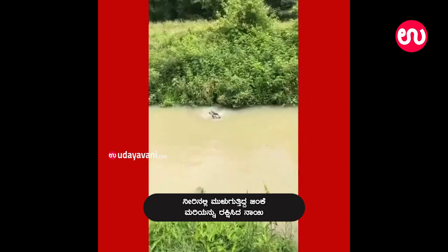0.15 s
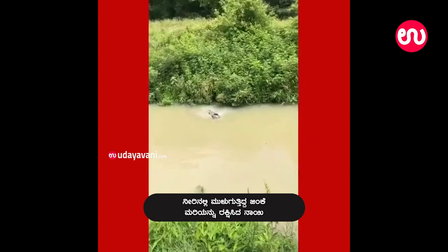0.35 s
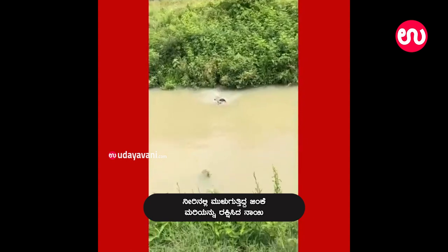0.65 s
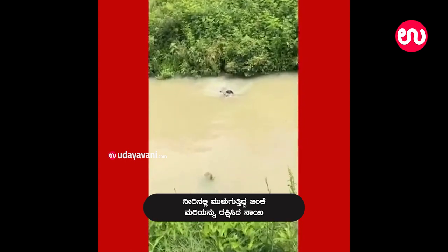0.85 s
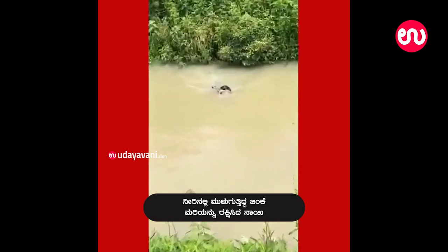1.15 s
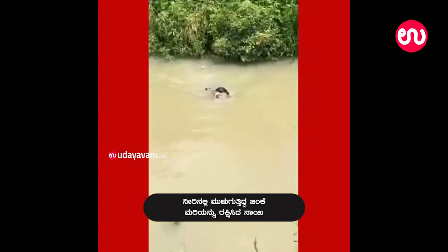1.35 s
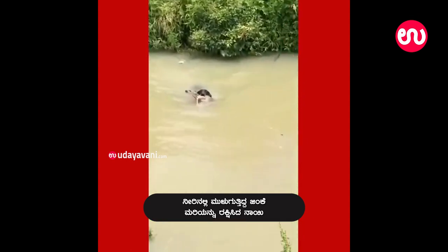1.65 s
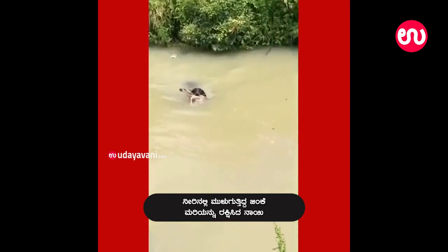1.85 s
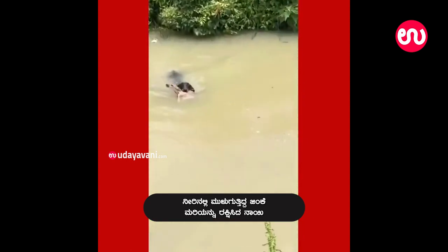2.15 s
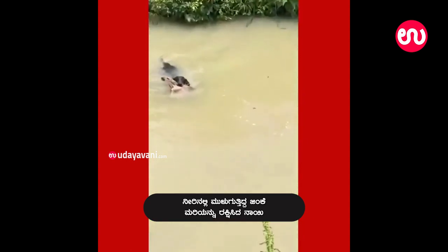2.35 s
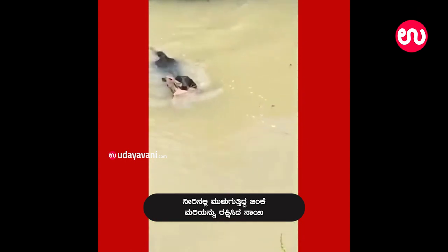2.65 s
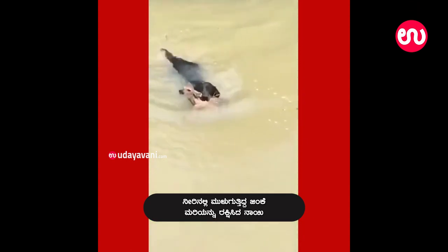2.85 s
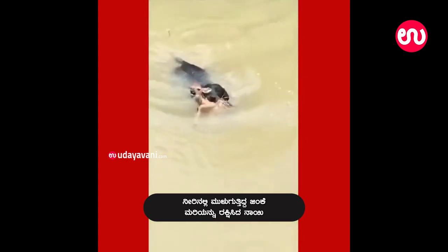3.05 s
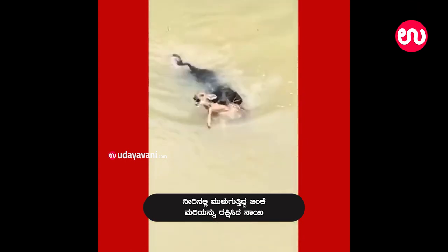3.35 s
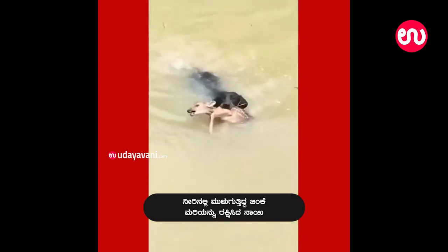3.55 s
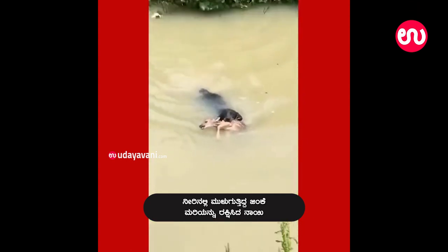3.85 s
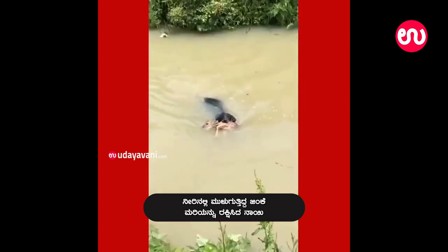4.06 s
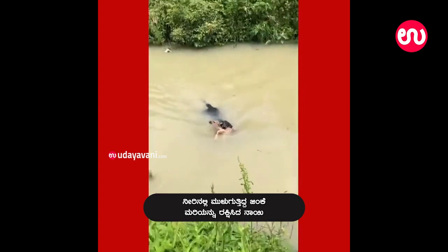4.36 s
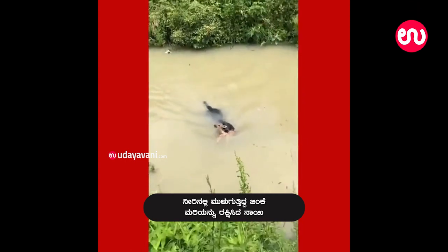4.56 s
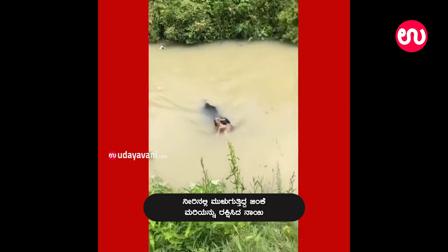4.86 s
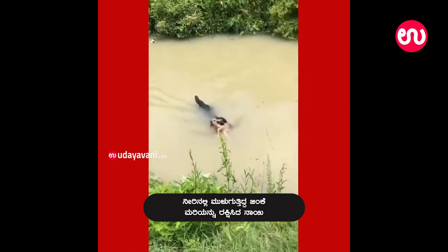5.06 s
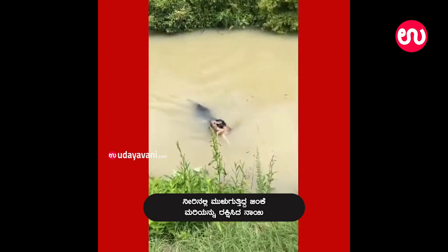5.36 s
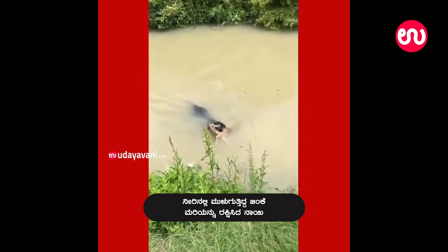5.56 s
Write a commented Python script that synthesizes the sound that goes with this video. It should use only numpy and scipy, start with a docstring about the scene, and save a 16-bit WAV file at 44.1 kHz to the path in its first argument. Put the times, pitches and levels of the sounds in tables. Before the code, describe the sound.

After a brief silence, a single-cylinder engine thuds fast and evenly beneath soft outdoor hiss and leaf rustle. A small bird chips faintly. Just past three seconds water plops and sloshes, then a fawn gives one loud, shrill, raspy bleat under half a second long. A faint echo follows, then more gulps and plops. Mono, outdoors on a riverbank, with the cry standing far forward.

```python
"""On a muddy river, a fawn carried across by a swimming dog gives one long shrill bleat.
A slow single-cylinder engine thuds on the bank, built from short low tones and ringing clatter.
Shaped noise makes the outdoor hiss, the sloshing water, the ticking grass and a wash after the cry.
Short sliding tones make the plops and the chips of a small bird. The bleat is a stack of
harmonics coloured by the throat; it and the bird leave soft echoes."""
import sys
import numpy as np
from scipy import signal
from scipy.fft import rfft, irfft
from scipy.io import wavfile
from scipy.ndimage import uniform_filter1d, minimum_filter1d

SR = 44100
rng = np.random.default_rng(int(sys.argv[2]) if len(sys.argv) > 2 else 0)


def wav_record(signal):
    """Record a signal, one row per channel, as 16-bit PCM in the file named by sys.argv[1]."""
    frames = np.transpose(np.atleast_2d(signal))
    bounded = np.clip(frames, -1, 1)
    # unit amplitude maps onto the largest positive 16-bit level
    quanta = np.round(bounded * 32767).astype(np.int16)
    wavfile.write(sys.argv[1], SR, quanta)


N = 251370
TIME = np.arange(N) / SR
START_S, TOP_HZ = .317, 13100

# colour of the outdoor hiss: (frequency [Hz], relative level [dB per Hz])
AIR_COLOUR = [(30, 7.5), (100, 16.5), (250, 8.5), (420, 2.5), (600, 2.5), (800, -2), (1000, -1), (1300, -5),
              (1650, -2.5), (2300, -8), (3800, -8.5), (5000, -18), (6500, -26), (10000, -30.5),
              (13000, -42)]
# gusts: (middle [s], half length [s], swell of the hiss [dB], rustle of leaves [dB])
GUSTS = [(0.347, 0.12, 1, 5), (0.804, 0.2, 2, 1.5), (1.106, 0.35, 0.5, 6.5), (1.799, 0.13, 0, 11),
         (3.803, 0.93, 1, 5), (5.251, 0.28, 1, 4)]
AIR_DB, AIR_FADE_DB_PER_S = -40, 0.3644
CALM_LEAVES_DB = -4  # the treble between gusts

# the engine's idle hunts a little: (time [s], lateness [s])
IDLE_HUNT = [(.3, -.004), (1.8, .001), (2.2, .008), (2.85, -.003), (3.3, -.004), (4.1, .001), (5.2, .002),
             (5.6, -.005)]
# thuds of each cycle: (delay after firing [s], frequency [Hz], level before the pipe [dB])
THUDS = [(.0063, 153.3, -25), (.0137, 94.8, -21), (.0242, 69.1, -17.5), (.0344, 179.6, -32),
         (.0459, 72, -17), (.069, 47.8, -21)]
# resonances and hollows of the exhaust pipe: (frequency [Hz], width [Hz], boost or cut [dB])
PIPE = [(69.6, 9.2, -2.5), (116.8, 1.8, 3), (126.4, 6.8, 6.5), (144.3, 10.8, -11.5)]
# engine clatter: (delay after firing [s], half length [s], frequency [Hz], width [Hz], level [dB])
CLATTER = [(.009, 0.0071, 229, 107.7, -44.5), (0.035, 0.013, 347.8, 59.4, -42),
           (0.064, .012, 230, 130, -47)]
FIRST_FIRING_S, CYCLE_S = .3325, .09588  # the steady beat, before the idle hunts

# noise bursts, water except for the second row, a wash of the cry's echo:
# (middle of bright noise [s], half length [s], bright level [dB], low lumpy level [dB])
NOISE_BURSTS = [(3.125, .06, -48.5, -46), (3.688, .012, -47, -55), (4.09, .051, -46.5, -42),
                (5.093, .07, -47, -41), (5.27, .024, -52, -54)]
WATER_SLOSHES = NOISE_BURSTS[:1] + NOISE_BURSTS[2:]
CRY_ECHO_WASH = NOISE_BURSTS[1]  # short and diffuse, just after the cry ends
# colour of the bright noise: (frequency [Hz], relative level [dB per Hz])
BRIGHT_COLOUR = [(1200, -19), (2200, -3.5), (3200, 5), (4200, -2), (6000, -16.5), (9000, -14), (13000, -27)]
# low gulps of water: (middle [s], half length [s], level [dB])
GULPS = [(4.17, 0.021, -41.5), (4.275, 0.017, -34.5), (4.411, 0.0077, -36.5), (4.709, 0.02, -35)]
LUMPY_LAG_S, LUMPY_LENGTH_SHARE = .028, .55  # later and shorter than the bright noise
LUMPY_HZ, LUMPY_WIDTH_HZ, LUMPY_DB, LUMPS_HZ = 850, 300, 4.5, 110
GULP_GURGLE_DB = -11.5  # gurgle mixed into a gulp
# plops in the water: (start [s], peak level [dB], starting pitch [Hz], glide [octaves])
PLOPS = [(3.088, -37, 814, -0.31), (3.113, -38, 725, -0.96), (4.118, -34, 1156, -0.26),
         (4.123, -33.5, 687, -0.097), (4.408, -37.5, 1095, -2), (4.699, -35.5, 1220, -2.55)]
PLOP_S = 0.0118

# faint ticks in the grass: (time [s], level [dB])
TICKS = [(2.357, -57), (2.755, -52), (2.879, -54), (5.266, -46)]
# bird chips: (start [s], peak level [dB], starting pitch [Hz], length [s])
CHIPS = [(.399, -42, 3634, .015), (0.414, -40.5, 2790, .015), (0.417, -44.5, 3510, 0.032),
         (1.61, -45.5, 3820, 0.025), (1.64, -45, 3766, 0.021), (1.843, -38, 3610, 0.013),
         (4.748, -41.5, 3650, .011), (4.831, -40.5, 3660, 0.032), (5.216, -41, 3117, 0.017),
         (5.229, -37.5, 2886, 0.01)]
CHIP_OCTAVES = -0.076

# colour of the fawn's throat: (frequency [Hz], level half open [dB], level gaping [dB])
THROAT = [(710, -50, -43.5), (1380, -41.5, -35), (2300, -30.5, -23), (2896, -17, -23), (3404, -19.5, -22),
          (4120, -32, -14), (4850, -30.5, -12), (5870, -30.5, -42), (6436, -37.5, -34.5), (6830, -65, -52),
          (7440, -46, -32), (8794, -34, -33), (8900, -41.5, -35), (10340, -57, -43.5), (12000, -56.5, -58)]
# brief catches of the voice: (time [s], depth [0-1])
CATCHES = [(3.277, 0.37), (3.292, 0.3), (3.314, 0.9), (3.33, 0.23), (3.353, 0.93), (3.391, 0.3),
           (3.439, 0.55)]
# the arching pitch of the bleat, before it droops: (time [s], pitch [Hz])
PITCH = [(3.228, 676.3), (3.268, 682), (3.32, 712), (3.408, 723.1), (3.456, 718.7), (3.492, 704.5),
         (3.612, 691.2)]
BLEAT_START_S, BLEAT_RELEASE_S, BLEAT_END_S = 3.2195, 3.585, 3.66
# the bleat breaks in and swells towards full effort, sagging slowly all the while
ATTACK_S, ONSET_DB, SWELL_S, FULL_DB, SAG_DB_PER_S = 0.012, -24, .052, -9, 9.5
# once let go, it falls ever faster, by this much at the end
RELEASE_DB, DROOP_HZ = 28, 45
# the mouth gapes once, late in the cry (0-1)
GAPE_OPEN_S, GAPE_SHUT_S, JAW_S, REST_GAPE = 3.425, 3.565, 0.017, 0.14
# the main resonance scoops up at the start, sinks as the jaw drops, then springs back
RING_HZ, RING_RISE_HZ_PER_S, RING_SCOOP_HZ, RING_SCOOP_S = 3296, 910, 550, .02
RING_DIP_HZ, RING_DIP_AT_S, RING_SINK_S, RING_RETURN_S = 740, 3.478, 0.061, 0.062
# it stands out further as the voice fades
LIFT_DB, RELEASE_LIFT_DB, RELEASE_LIFT_S = 10.5, 21, 0.04
# hoarseness: extra at the onset, slight in the swell, strong under strain, then nearly clear
RASP_ONSET, RASP_SWELL, RASP_STRAIN, RASP_CLEAR = .3, .14, .42, .02
STRAIN_FROM_S, STRAIN_TO_S, RASP_CHANGE_S = 3.39, 3.475, .016
CATCH_RASP = .8  # extra hoarseness during a full catch, around the main resonance


def gain_of(db):
    """Turns decibels into a factor."""
    return 10 ** (np.asarray(db) / 20)


def evened(x):
    """Scales a sound to rms 1."""
    return x / np.sqrt(np.mean(x ** 2) + 1e-20)


def curves(rows, t):
    """Joins each column of a table by straight lines in time."""
    s, *columns = np.transpose(rows)
    return [np.interp(t, s, c) for c in columns]


def read(points, hz):
    """Reads each column of a spectrum along a log-frequency axis."""
    f, *columns = np.transpose(points)
    return [np.interp(np.log(hz + 1), np.log(f), c) for c in columns]


def noise(spectrum):
    """Makes noise of rms 1 with the given spectrum."""
    level_db = read(spectrum, np.fft.rfftfreq(N, 1 / SR))[0]
    return evened(irfft(rfft(rng.standard_normal(N)) * gain_of(level_db), N))


def band(hz, width, size=N):
    """Makes noise of rms 1 in a bell around hz; around zero it is a slow wander."""
    f = np.fft.rfftfreq(size, 1 / SR)
    weight = np.exp(-((f - hz) / width) ** 2 / 2)
    return evened(irfft(rfft(rng.standard_normal(size)) * weight, size))


def bell(x, width):
    """Makes a smooth bump of height 1 around zero."""
    return np.exp(-(x / width) ** 2)


def step(x, width):
    """Makes a smooth step from 0 to 1 around zero."""
    return (1 + np.tanh(x / width)) / 2


def add(mix, s, sound):
    """Mixes a sound in at a time in seconds."""
    part = mix[max(round(s * SR), 0):][:len(sound)]
    part += sound[:len(part)]


def glides(rows, wobble, skew):
    """Short sliding tones with an unsteady pitch; a skew under 1 sharpens their attack."""
    out = np.zeros(N)
    for s, db, hz, length, octaves in rows:
        u = np.linspace(0, 1, max(round(length * SR), 2))
        unsteady = 1 + wobble * band(0, 180, size=8192)[:len(u)]
        pitch = hz * 2 ** (octaves * u) * unsteady
        swell = np.sin(np.pi * u ** skew)
        add(out, s, gain_of(db) * swell * np.sin(2 * np.pi * np.cumsum(pitch) / SR))
    return out


def bright_noise(fizz_db=1.0):
    """Bright noise with a fizzing level."""
    return evened(noise(BRIGHT_COLOUR) * gain_of(fizz_db * band(0, 150)))


def lumpy_noise():
    """Lower noise with a lumpy level."""
    return evened(band(LUMPY_HZ, LUMPY_WIDTH_HZ) * gain_of(LUMPY_DB * band(0, LUMPS_HZ)))


def burst(row, bright, lumpy):
    """A swell of bright noise, then a shorter one of lumpy noise."""
    s, length, bright_db, lumpy_db = row
    lumpy_swell = bell(TIME - s - LUMPY_LAG_S, LUMPY_LENGTH_SHARE * length)
    return gain_of(bright_db) * bell(TIME - s, length) * bright + gain_of(lumpy_db) * lumpy_swell * lumpy


def background(treble_hz=5500, waver_db=1.1, rustle_db=2):
    """Even outdoor hiss swells in gusts; the leaves add a fluttering treble."""
    level_db = sum(db * bell(TIME - s, length) for s, length, db, _ in GUSTS) - AIR_FADE_DB_PER_S * TIME
    leaves_db = sum(db * bell(TIME - s, length) for s, length, _, db in GUSTS) + CALM_LEAVES_DB
    air = noise(AIR_COLOUR)
    highpass = signal.butter(4, treble_hz, "high", fs=SR, output="sos")
    treble = signal.sosfiltfilt(highpass, air)
    leaves = treble * gain_of(leaves_db + rustle_db * band(0, 40))
    # the fluttering leaves take the place of the plain treble
    return gain_of(AIR_DB + level_db + waver_db * band(0, 19.0)) * (air - treble + leaves)


def engine(cycles=0.73, uneven_db=1.5, stagger_s=0.00041, alike=0.52):
    """Each firing sends a run of low thuds down the pipe, and the casing clatters along."""
    firings = FIRST_FIRING_S + CYCLE_S * np.arange(N / SR / CYCLE_S)
    firings = firings + curves(IDLE_HUNT, firings)[0]
    out, u = np.zeros(N), np.arange(-SR // 20, SR // 20) / SR
    for s in firings:
        chances = rng.standard_normal((len(THUDS), 2))
        for (delay, hz, db), (loud, late) in zip(THUDS, chances):
            thud = np.cos(2 * np.pi * hz * u) * bell(hz * u, cycles)
            add(out, s + delay + stagger_s * late + u[0], gain_of(db + uneven_db * loud) * thud)
    f = np.fft.rfftfreq(N, 1 / SR)
    pipe_db = sum(db * bell(f - hz, width) for hz, width, db in PIPE)
    out = irfft(rfft(out) * gain_of(pipe_db), N)
    # how far each moment lies into its engine cycle, in seconds of the steady beat
    since = (np.interp(TIME, firings, np.arange(len(firings))) % 1) * CYCLE_S
    for delay, length, hz, width, db in CLATTER:  # partly the same ring each time, partly loose rattle
        ring = np.sqrt(2 * alike) * np.cos(2 * np.pi * hz * (since - delay))
        rattle = np.sqrt(1 - alike) * band(hz, width)
        out += gain_of(db) * bell(since - delay, length) * (ring + rattle)
    return out


def water(gulp_hz=200, gulp_width_hz=60):
    """Each slosh is a hiss of spray and then a lumpy gurgle; low gulps gurgle only a little."""
    gulp = band(gulp_hz, gulp_width_hz)
    spray, gurgle = bright_noise(), lumpy_noise()
    sloshes = sum(burst(row, spray, gurgle) for row in WATER_SLOSHES)
    gulps = sum(gain_of(db) * bell(TIME - s, length) for s, length, db in GULPS)
    return sloshes + gulps * (gulp + gain_of(GULP_GURGLE_DB) * gurgle)


def plops():
    """Each plop in the water is a short tone that slides down."""
    rows = [(s, db, hz, PLOP_S, octaves) for s, db, hz, octaves in PLOPS]
    return glides(rows, wobble=0.087, skew=0.67)


def grass(tick_s=0.003, tick_hz=3500, tick_width_hz=3500):
    """Dry stalks tick: very short bumps of broad noise."""
    ticks = sum(gain_of(db) * bell(TIME - s, tick_s) for s, db in TICKS)
    return band(tick_hz, tick_width_hz) * ticks


def small_bird():
    """Each chip is a short, high tone that slides slightly down."""
    return glides([(*chip, CHIP_OCTAVES) for chip in CHIPS], wobble=0.021, skew=0.93)


def banks(x, t60=1.0, dull_hz=4500, echo_s=0.64, echo_length_s=0.055, echo=0.11):
    """Bushes scatter a dull tail, and the far bank returns a soft echo."""
    t = np.arange(SR) / SR
    fade = gain_of(-60 * t / t60) + echo * bell(t - echo_s, echo_length_s)
    tail = rng.standard_normal(SR) * fade
    lowpass = signal.butter(4, dull_hz, fs=SR, output="sos")
    tail = signal.sosfilt(lowpass, tail / np.linalg.norm(tail))
    return signal.fftconvolve(x, tail)[:N]


def cry_echo_wash():
    """A short diffuse wash of the cry's echo, just after it ends, made from noise."""
    return burst(CRY_ECHO_WASH, bright_noise(), lumpy_noise())


def effort(t):
    """Loudness and pitch of the cry: a swell, a slowly sagging hold, and a release where both fall."""
    age = t - BLEAT_START_S
    slack = np.maximum((t - BLEAT_RELEASE_S) / (BLEAT_END_S - BLEAT_RELEASE_S), 0) ** 2
    swell_db = ONSET_DB + (FULL_DB - ONSET_DB) * np.minimum(age / SWELL_S, 1) ** 2
    db = swell_db - SAG_DB_PER_S * age - RELEASE_DB * slack
    loudness = np.minimum(age / ATTACK_S, 1) * gain_of(db)
    return loudness, curves(PITCH, t)[0] - DROOP_HZ * slack


def mouth(t):
    """The gape of the mouth, and the frequency and lift of the main resonance."""
    age, late = t - BLEAT_START_S, t - RING_DIP_AT_S
    wide = step(t - GAPE_OPEN_S, JAW_S) * step(GAPE_SHUT_S - t, JAW_S)
    gape = REST_GAPE + (1 - REST_GAPE) * wide
    dip = bell(late, np.where(late < 0, RING_SINK_S, RING_RETURN_S))
    scoop = bell(age, RING_SCOOP_S)
    ring_hz = RING_HZ + RING_RISE_HZ_PER_S * age - RING_SCOOP_HZ * scoop - RING_DIP_HZ * dip
    lift_db = LIFT_DB + RELEASE_LIFT_DB * np.clip((t - BLEAT_RELEASE_S) / RELEASE_LIFT_S, 0, 1)
    return np.clip(gape, 0, 1), ring_hz, lift_db


def hoarseness(t):
    """The vocal folds start roughly, settle, grow hoarse under strain, and clear."""
    return (RASP_SWELL + RASP_ONSET * bell(t - BLEAT_START_S, RASP_CHANGE_S)
            + (RASP_STRAIN - RASP_SWELL) * step(t - STRAIN_FROM_S, RASP_CHANGE_S)
            + (RASP_CLEAR - RASP_STRAIN) * step(t - STRAIN_TO_S, RASP_CHANGE_S))


def fawn(jitter=0.0008, rasp_jitter=0.012, lift_width_hz=430, slip=0.039, catch_s=0.0025, thirds=0.37,
         hoarse_hz=1600, skirt_hz=190, flutter_db=1.5):
    """Vocal folds buzz through a throat that gapes and shuts; they catch and, under strain, rasp."""
    t = np.arange(BLEAT_START_S, BLEAT_END_S, 1 / SR)
    size = len(t)
    loudness, pitch = effort(t)
    gape, ring_hz, lift_db = mouth(t)
    rasp = hoarseness(t)
    unsteady = 1 + (jitter + rasp_jitter * rasp) * band(0, 160, size=size)
    turns = np.cumsum(pitch * unsteady) / SR  # cycles of the vocal folds so far
    choke = np.zeros(size)
    for s, depth in CATCHES:  # each catch chokes the voice and slips its cycle
        choke += depth * bell(t - s, catch_s)
        turns += slip * depth * np.tanh((t - s) / catch_s)
    voice, power = np.zeros(size), np.zeros(size)
    for third in range(3, 56):  # steps of a third of the pitch
        k = third / 3
        half_db, wide_db = read(THROAT, k * pitch)
        ring = bell(k * pitch - ring_hz, lift_width_hz)
        gain = gain_of(half_db + gape * (wide_db - half_db) + lift_db * ring)
        angle = 2 * np.pi * (k * turns + rng.random())
        if third % 3 == 0:  # a clean harmonic; the higher ones wear a hoarse skirt of noise
            flutter = gain_of(flutter_db * band(0, 36, size=size))
            line = (1 - choke) * flutter * np.cos(angle)
            skirt = band(0, skirt_hz, size=size) * np.cos(angle)
            skirt = (skirt + band(0, skirt_hz, size=size) * np.sin(angle)) / 2
            roughness = (rasp + CATCH_RASP * choke * ring) * (1 - bell(k * pitch, hoarse_hz))
            voice += gain * (line + roughness * skirt)
            power += gain ** 2 / 2
        else:  # rasping folds repeat only every third cycle
            wander = band(0, 24, size=size)
            voice += gain * thirds * (rasp + choke * ring) * wander * np.cos(angle)
    out = np.zeros(N)
    add(out, t[0], loudness * voice / np.sqrt(power))  # the throat colours, effort sets the level
    return out


def scene(bleat_wet_db=-32, bird_wet_db=-8):
    """All the sources together, with echoes of the bleat and the bird."""
    cry, bird = fawn(), small_bird()
    echoes = banks(gain_of(bleat_wet_db) * cry + gain_of(bird_wet_db) * bird) + cry_echo_wash()
    return (background() + engine() + water() + plops() + grass() + bird + cry + echoes)[None]


def record(dry):
    """A limiter holds the peaks, silence leads in, the end fades briefly, and the top treble is cut."""
    headroom = np.minimum(1, .92 / (abs(dry) + 1e-9))
    # hold the lowest gain nearby, then smooth it
    held = dry * uniform_filter1d(minimum_filter1d(headroom, size=200), size=200)
    running = (TIME >= START_S) * np.minimum((TIME[-1] - TIME) / .006, 1)
    lowpass = signal.firwin(511, TOP_HZ, window=("kaiser", 9), fs=SR)
    return signal.oaconvolve(held * running, lowpass[None], "same")


dry = scene()
out = record(dry)
wav_record(out)
```